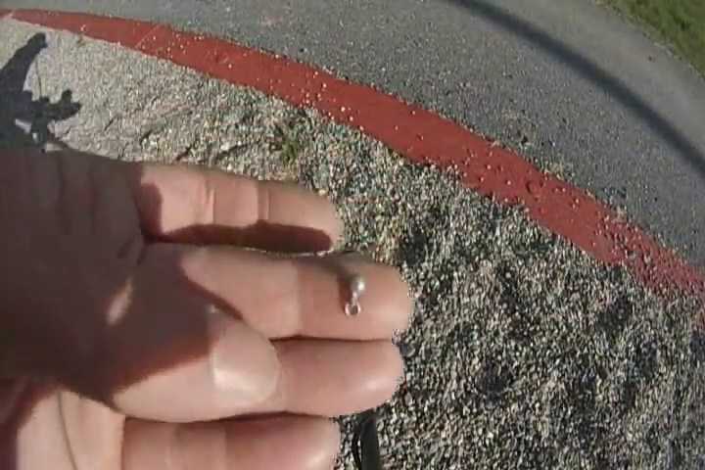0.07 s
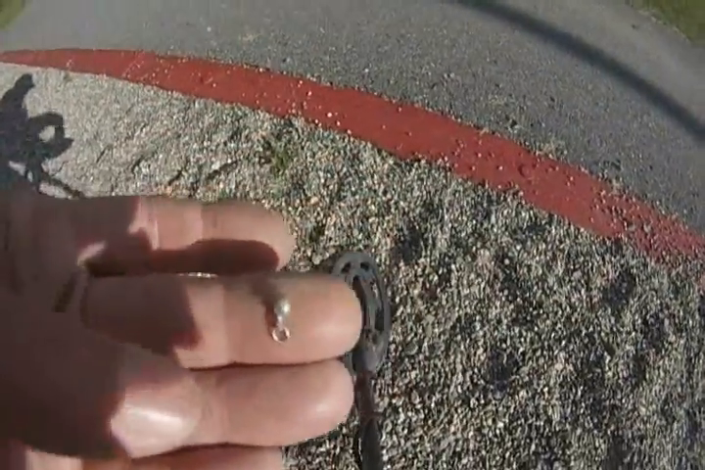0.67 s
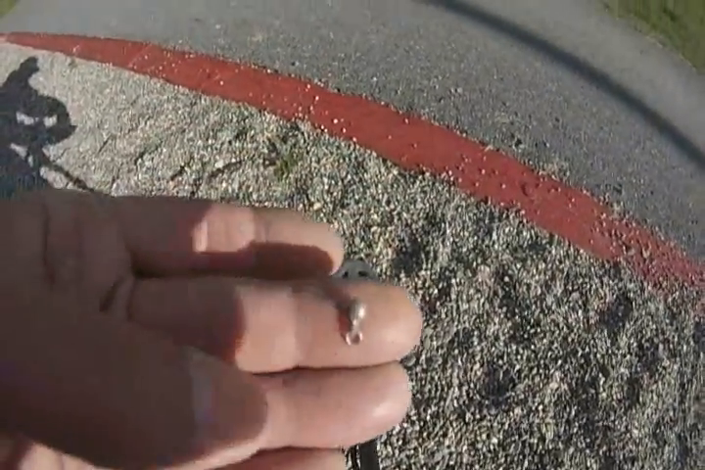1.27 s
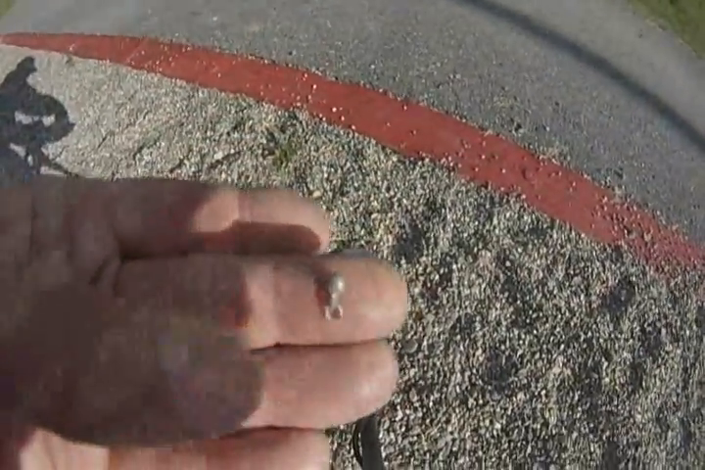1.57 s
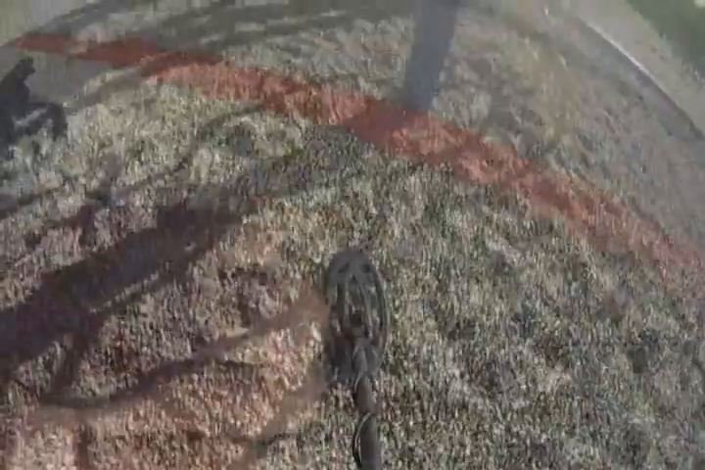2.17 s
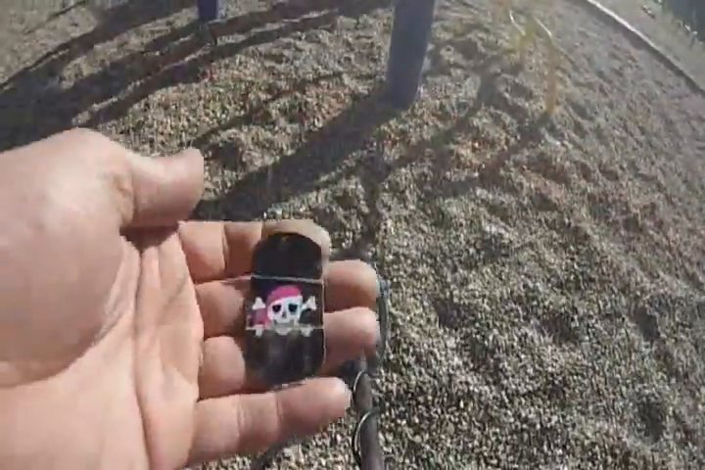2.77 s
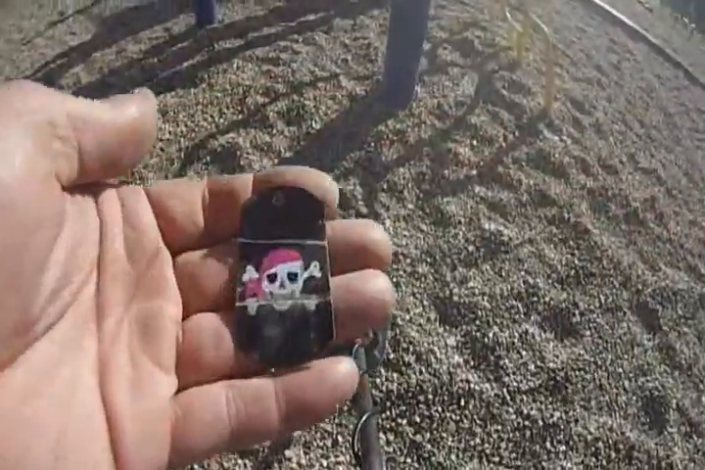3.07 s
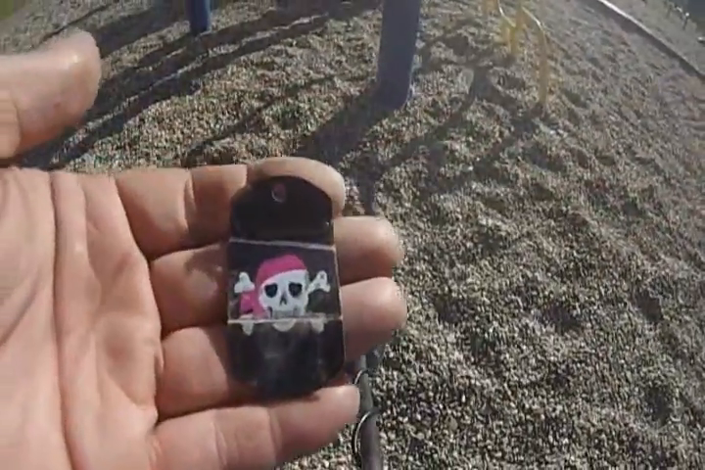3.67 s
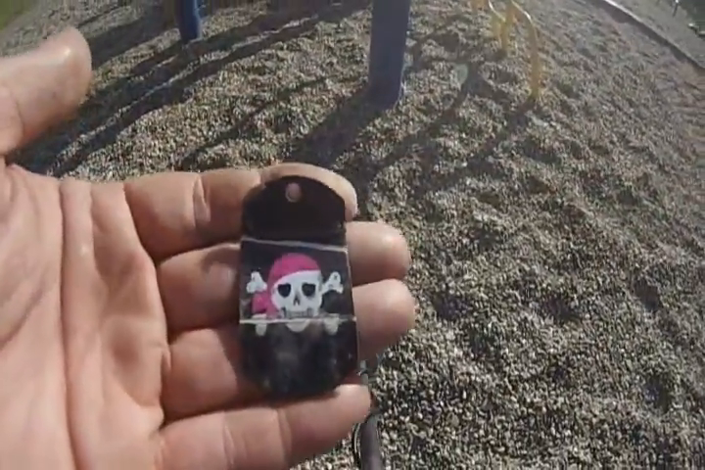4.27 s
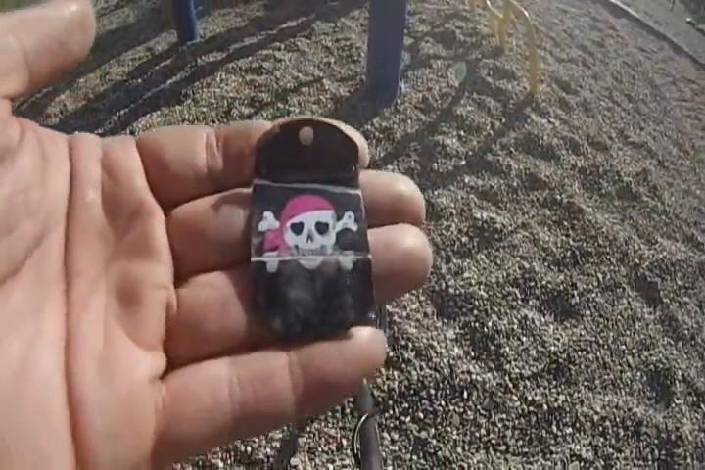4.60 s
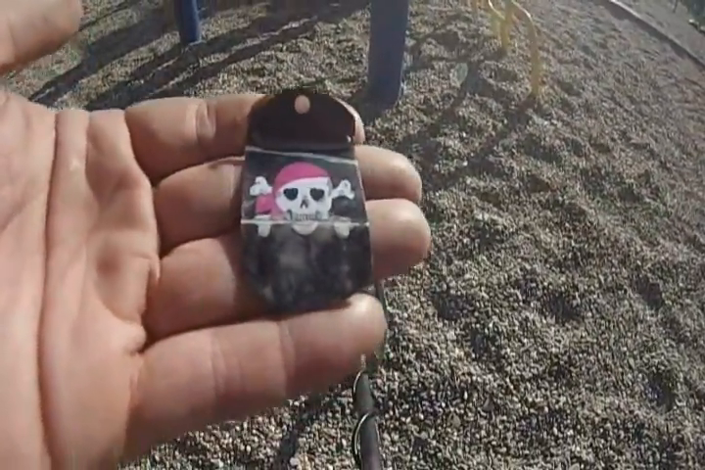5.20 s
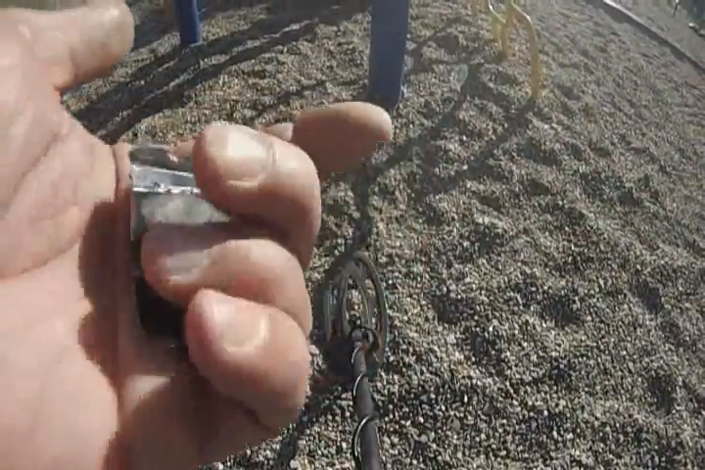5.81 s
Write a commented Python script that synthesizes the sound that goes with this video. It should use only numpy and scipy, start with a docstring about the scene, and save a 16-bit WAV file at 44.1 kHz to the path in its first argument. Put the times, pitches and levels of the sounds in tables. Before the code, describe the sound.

Fingers rub and knock on a plastic camera case amid short, gritty gravel scrapes, then ease into faint brushing outdoors.

```python
"""Gravel scrapes and rubbing fingers

A hand scrapes and shuffles over playground pea gravel in short spells, near a camera in a plastic case.
Gritty scrapes and fingers rubbing on the case make dull drags, bright slides and soft brushes.
Knocks ring the hollow case, soft pushes thump it, and the hand swishes past.
Handling adds a low rumble over faint outdoor air; one small chirp comes near the end."""
import sys
import numpy as np
from scipy import signal
from scipy.io import wavfile

SR = 44100
rng = np.random.default_rng(int(sys.argv[2]) if len(sys.argv) > 2 else 0)


def persist_wave(psi):
    """Save psi, clipped to +-1, as 16-bit WAV."""
    counts = np.round(np.clip(psi, -1, 1) * 32767).astype(np.int16)
    wavfile.write(sys.argv[1], SR, np.atleast_2d(counts).T)


N = 266805

# Hand strokes, one table for each kind. The body is the low part of the sound, the hiss the high part.
# (start t/s, attack t/s, hold t/s, release t/s, body level/dB, hiss level/dB, swell while held/dB)
DRAGS = [(0.0, 0.0017, 0.042, 0.023, -45, -59, 1.5), (.5, 0.0094, .01, 0.043, -53.5, -74, -0.5),
         (.562, 0.048, 0.21, .07, -28, -37.5, -20), (.84, 0.024, 0.073, 0.073, -48, -59.5, -1.5),
         (1.49, 0.033, 0.035, 0.11, -47, -44.5, 0), (1.59, 0.034, 0.31, 0.05, -52.5, -54.5, 11),
         (1.83, .02, 0.28, 0.027, -37.5, -44, 1.5), (2.07, 0.031, 0.0078, 0.012, -28.5, -33.5, 7),
         (2.19, .02, .13, 0.36, -42.5, -54, -2.5), (2.61, 0.022, 0.087, 0.14, -41, -56, 5),
         (2.772, 0.0058, 0.15, 0.057, -40.5, -53, -2.5), (2.93, 0.045, 0.62, .25, -48.5, -59, -4),
         (3.79, 0.018, 0.044, 0.088, -51.5, -70, -2.5), (4.01, 0.0071, .05, 0.54, -54.5, -69, -0.5),
         (4.24, 0.056, 0.14, .055, -45, -64, 9), (4.535, 0.009, 0.027, 0.3, -55, -68, -1.5),
         (4.63, 0.041, 0.12, 0.055, -43, -57.5, 8), (4.805, 0.016, 0.065, 0.059, -49, -62.5, 9.5),
         (5.74, 0.041, 0.08, 0.14, -57.5, -64, -4), (5.96, 0.017, .012, 0.039, -52, -47.5, 0)]
LIGHT_SLIDES = [(1.034, 0.0016, 0.017, 0.088, -40, -43, -3.5), (1.118, 0.019, 0.034, .04, -38, -46, 4.5),
                (4.988, .005, 0.041, 0.063, -48.5, -50, 8), (5.06, 0.048, 0.066, .06, -37.5, -50, 0.5),
                (5.19, 0.016, 0.16, .06, -37, -45.5, -0.5), (5.36, 0.021, 0.048, 0.011, -44, -43.5, -2),
                (5.925, .008, .01, 0.037, -52.5, -58, 2.5)]
SLIDES = [(1.165, 0.06, 0.1, 0.12, -31.5, -33.5, -1.5), (1.35, 0.051, 0.021, 0.028, -33.5, -47.5, 0.29),
          (5.054, 0.0035, 0.055, 0.042, -38, -40.5, 2.5)]
SWIPES = [(1.992, 0.0097, .012, 0.017, -32, -39.5, -0.63), (2.105, 0.012, 0.028, 0.082, -36, -40.5, 1.7),
          (2.14, 0.016, 0.0076, 0.014, -54, -34.5, 0)]
BRUSHES = [(2.434, 0.0019, 0.044, 0.053, -44, -47.5, 3), (2.49, 0.021, 0.041, 0.1, -41.5, -39, -0.5),
           (2.575, 0.016, 0.028, 0.031, -43, -35.5, -6.5), (5.42, 0.025, 0.094, .06, -56, -47, 6),
           (5.53, 0.024, 0.019, 0.082, -42, -40, -0.5), (5.59, .02, 0.05, 0.11, -54, -46, 1.5)]
# Tone colour of each kind of stroke: a curve (f/Hz, level/dB),
# then the resonances it wakes, which are peaks on that curve (f/Hz, width/Hz, height/dB).
DRAG_COLOUR = ([(20, -25), (100, -22.5), (250, -19.5), (420, -17), (700, -15.5), (1400, -33), (3000, -32.5),
               (5500, -39.5), (8000, -46), (16000, -55)], [(82.6, 40.5, 26.5), (545, 37, 9.5),
               (680.5, 280, 15), (1033, 360, 19.5), (1734, 560, 16), (2592, 110, 16.5), (4880, 580, 3)])
LIGHT_SLIDE_COLOUR = ([(100, -24.5), (250, -25), (420, -22.5), (700, -5), (1400, -17.5), (3000, -19),
                      (5500, -27.5), (8000, -31.5), (16000, -22)], [(772, 29, 12.7), (969, 174, 11.4),
                      (1864, 360, 15.3), (2432, 110, 11.7), (2975, 860, 19.2), (4030, 770, 24.8),
                      (5060, 1230, 23.8), (6840, 380, 16), (8200, 1940, 19), (11860.0, 980, 9.8)])
SLIDE_COLOUR = ([(100, -39), (250, -27), (420, -24), (700, -4.5), (1400, -14.5), (3000, -15.5),
                (5500, -21.5), (8000, -31.5), (16000, -45.5)], [(762, 130, 7.2), (1640, 160, 6.7),
                (2380, 130, 7.7), (2930, 150, 5.3), (3900, 260, 4.9), (4070, 360, 5), (5020, 520, 6.6),
                (11700, 260, 3.2)])
SWIPE_COLOUR = ([(100, -14), (400, -34), (700, -18.5), (1400, -23), (2600, -9.5), (5500, -11.5),
                (7500, -16.5), (9500, -25), (16000, -27)], [(706, 80, 8.5), (1140, 200, 8.5),
                (1600, 200, 2.8), (3680, 160, 8.3), (5330, 600, 5)])
BRUSH_COLOUR = ([(100, -34.5), (250, -12), (420, -15.5), (700, -6.5), (1400, -11.5), (3000, -21.5),
                (5500, -27), (8000, -34), (16000, -43)], [(625, 660, 20), (1086, 310, 11.2),
                (1785, 180, 14), (2680, 150, 6.7), (3270, 1140, 10.9), (5100, 260, 8.3)])
# Tone colour of the shaking case, the outdoor air and the crack of a knock (f/Hz, level/dB).
RUMBLE_COLOUR = [(15, -2), (40, -9.5), (60, 3.5), (85, -1), (125, -8), (200, -21), (320, -17.5),
                 (600, -49.5)]
AIR_COLOUR = [(20, -12.5), (90, -3.5), (200, -4), (400, -7), (750, -8), (1050, -9.5), (1350, -16),
              (2500, -17.5), (5000, -22), (9000, -27.5), (16000, -39.5)]
CRACK_COLOUR = [(300, -23), (900, 10), (1500, 1), (3500, -4.5), (5500, -14), (8000, -18.5), (16000, -42)]
# Knocks on the case (t/s, hollow level/dB, wall level/dB, hollow f/Hz, stretch factor of the fade).
KNOCKS = [(.576, -32, -48, 915, 1.7), (.6045, -15.5, -38, 725, 1.7), (.618, -19, -46, 660, 2.5),
          (.6427, -33, -25, 920, 2), (.65, -24, -25.5, 725, 1), (.908, -33.5, -64, 704, 2.2),
          (1.305, -22, -45, 747, 3), (1.344, -24.5, -31, 1170, .9), (1.4, -14.5, -20.5, 1130, 0.85),
          (1.409, -21, -25.5, 920, 0.66), (1.545, -40, -26, 725, 1.4), (1.6225, -30, -30, 870, 0.61),
          (1.708, -44, -38.5, 770, 1.7), (1.736, -32, -28.5, 760, 1.4), (1.846, -22.5, -32, 880, 1.1),
          (1.851, -23.5, -30.5, 820, 0.92), (1.874, -19.5, -28.5, 795, 1), (1.924, -27, -27, 1120, .8),
          (1.9695, -28.5, -25.5, 690, 0.73), (1.9817, -28, -23.5, 750, 0.95), (2.038, -28, -29, 620, 1.7),
          (2.059, -24, -24, 1000, 1.1), (2.104, -11, -29, 964, 0.69), (2.1895, -11, -17.5, 805, 1.44),
          (2.196, -18.5, -35, 910, 1.2), (2.471, -31.5, -38.5, 1250, 1.2), (2.779, -31.5, -46, 674, .8),
          (3.53, -34.5, -49, 583, 2.7), (3.829, -37.5, -56, 630, 1.1), (3.915, -34.5, -57, 600, 0.73),
          (4.2, -36.5, -55, 1170, 0.56), (4.389, -23.5, -45, 606, 3.3), (4.401, -31, -53, 606, 0.52),
          (4.45, -35, -47, 660, 0.89), (4.694, -36, -47, 660, 1.3), (4.785, -43, -40, 534, 1.9),
          (5.937, -39.5, -55, 784, 1.2)]
# Natural tones of the case walls, which each knock varies (f/Hz, level/dB, fade t/s).
# A fade is the time a sound takes to fall by 60 dB.
WALL_TONES = [(1757, 5, 0.019), (2510, -4, .012), (2897, -6, 0.027), (3250, 1.5, 0.01), (4124, 3, 0.019),
              (5130, 2.5, 0.021), (5700, -11, 0.016), (6400, -29, 0.008)]
# Soft pushes on the case (t/s, level/dB, f/Hz, fade t/s).
PUSHES = [(.915, -37, 73, 0.18), (1.392, -32, 100, 0.12), (1.619, -9, 26, 0.018), (1.63, -35, 16, .12),
          (1.848, -24, 86, 0.081), (1.877, -20, 97, 0.055), (1.983, -23, 46, 0.052),
          (2.105, -16.5, 90, 0.042), (2.195, -26.5, 83, 0.088), (4.79, -29.5, 74, 0.15)]
# A thin metallic ring (t/s, level/dB, f/Hz, width/Hz, fade t/s).
THIN_RING = (2.19, -59, 4200, 300, .6)
# Quick swishes of the hand, each a list of points along its way (t/s, level/dB, f/Hz).
SWISH_PATHS = [
    [(2.85, -44.5, 1010), (2.92, -46.5, 1140), (3.02, -45.5, 1260), (3.1, -50, 1300), (3.16, -62, 1390)],
    [(4.14, -55, 990), (4.175, -45.5, 1150), (4.196, -36.5, 1290), (4.21, -44, 1360), (4.235, -64, 1590)],
]


def amp(db):
    """Turns decibels into a factor to multiply by."""
    return 10 ** (np.asarray(db) / 20)


def evened(x):
    """Scales a sound to an average strength (rms) of 1."""
    return x / np.sqrt(np.mean(x ** 2) + 1e-20)


def burst(x, length_s=0.002):
    """Scales a hit to the energy of a short burst of strength 1."""
    return x / np.sqrt(np.sum(x ** 2) / (length_s * SR))


def add(mix, s, sound):
    """Mixes a sound in, starting at s seconds."""
    part = mix[max(round(s * SR), 0):][:len(sound)]
    part += sound[:len(part)]


def band(x, edge_hz, kind, order=4):
    """Keeps the "low" or the "high" side of a sound."""
    return signal.sosfilt(signal.butter(order, edge_hz, kind, fs=SR, output="sos"), x)


def coloured(x, curve, resonances=(), size=4096):
    """Gives a sound its tone colour: a curve with peaks standing on it."""
    f = abs(np.fft.fftfreq(size, 1 / SR))
    hz, db = np.transpose(curve)
    gain_db = np.interp(np.log(f + 1), np.log(hz), db)
    for centre, width, height in resonances:
        gain_db += height / (1 + (2 * (f - centre) / width) ** 2)
    # this makes each click ring after it lands, not before
    spectrum = np.exp(np.conj(signal.hilbert(np.log(amp(gain_db)))))
    return signal.fftconvolve(x, np.fft.ifft(spectrum).real)[:len(x)]


def resonate(x, hz, width_hz):
    """Keeps the sound near a steady or moving pitch: shift it to zero, smooth it, shift it back."""
    turn = np.exp(2j * np.pi * np.cumsum(hz * np.ones(len(x))) / SR)
    return (turn * band(x / turn, width_hz / 2, "low", order=2)).real


def fading_tone(t, hz, fade_s):
    """One pure tone that dies away."""
    return np.sin(2 * np.pi * hz * t) * amp(-60 * t / fade_s)


def pressure(rows, release_drop_db=21.5):
    """Strength of body and hiss over time: each stroke bites, swells or sags, then dies away."""
    power = np.zeros((2, N))
    for start, attack, hold, release, body_db, hiss_db, swell_db in rows:
        t = np.arange(N) / SR - start
        held = np.clip((t - attack) / hold, 0, 1)
        let_go = np.maximum(t - attack - hold, 0) / release
        shape = np.clip(t / attack, 0, 1) * amp(swell_db * held - release_drop_db * let_go)
        power += (amp([[body_db], [hiss_db]]) * shape) ** 2
    return np.sqrt(power)


def friction(slips_per_s, spread_db, hiss, judder_db, judder_hz):
    """Tiny slips of uneven size over a smooth hiss; the contact judders, so they come in clumps."""
    sizes = amp(spread_db * np.minimum(rng.exponential(1, N), 4)) * rng.choice([-1, 1], N)
    slips = evened(sizes * (rng.random(N) < slips_per_s / SR))
    rasp = slips + hiss * rng.standard_normal(N)
    judder = evened(band(rng.standard_normal(N), judder_hz, "low", order=2))
    return rasp * amp(judder_db * judder)


def strokes(rows, colour, rubbing, split_hz=1400):
    """Rubbing heard through the case: pressure feeds its hollow body, speed feeds the hiss above."""
    body_gain, hiss_gain = pressure(rows)
    sound = coloured(rubbing, *colour)
    body = evened(band(sound, split_hz, "low"))
    hiss = evened(band(sound, split_hz, "high"))
    return body_gain * body + hiss_gain * hiss


def scraping():
    """Scrapes and fingers rubbing the case: slow drags are gritty, faster strokes blur into a rasp."""
    drag = friction(slips_per_s=1200, spread_db=2.0, hiss=0.58, judder_db=2.5, judder_hz=75)
    slide = friction(slips_per_s=4000, spread_db=1.5, hiss=0.67, judder_db=-0.35, judder_hz=91)
    light = friction(slips_per_s=4000, spread_db=3.5, hiss=0.56, judder_db=1.0, judder_hz=70)
    brush = friction(slips_per_s=2500, spread_db=0.2, hiss=0.93, judder_db=1.4, judder_hz=59)
    swipe = friction(slips_per_s=5500, spread_db=1.0, hiss=1.0, judder_db=3.0, judder_hz=90)
    return (strokes(DRAGS, DRAG_COLOUR, drag)
            + strokes(LIGHT_SLIDES, LIGHT_SLIDE_COLOUR, light)
            + strokes(SLIDES, SLIDE_COLOUR, slide)
            + strokes(SWIPES, SWIPE_COLOUR, swipe)
            + strokes(BRUSHES, BRUSH_COLOUR, brush))


def rumble(rest_db=-62.5, drag_db=-46, slide_db=-52.5, firm_db=-35, growth=0.69):
    """The held case trembles a little at rest and shakes more the harder the hand drags or slides."""
    drag = pressure(DRAGS)[0]
    slide = pressure(SLIDES)[0] + pressure(LIGHT_SLIDES)[0]
    # a stroke whose body is at firm_db shakes the case at drag_db or slide_db
    dragged = amp(drag_db) * (drag / amp(firm_db)) ** growth
    slid = amp(slide_db) * (slide / amp(firm_db)) ** growth
    shake = np.sqrt(amp(rest_db) ** 2 + dragged ** 2 + slid ** 2)
    return shake * evened(coloured(rng.standard_normal(N), RUMBLE_COLOUR))


def air(level_db=-61):
    """The faint, steady hush of outdoor air."""
    return amp(level_db) * evened(coloured(rng.standard_normal(N), AIR_COLOUR))


def wall_clack(t, wall_db, stretch, soft_hz=1815, rise_hz=14400, reach_octaves=0.34):
    """A blow rings the wall tones near its own pitch; harder blows wake higher tones."""
    contact_hz = soft_hz + rise_hz * amp(wall_db)
    walls = np.zeros(len(t))
    for hz, db, fade_s in WALL_TONES:
        # where the blow lands decides the sign and exact pitch of each tone
        share = rng.choice([-1, 1]) / (1 + (np.log2(hz / contact_hz) / reach_octaves) ** 2)
        walls += share * amp(db) * fading_tone(t, hz * rng.uniform(0.91, 1.03), fade_s * stretch)
    return band(walls, 5700, "low", order=2)


def knocks(upper_ratio=1.3, upper_db=-9, base_fade_s=0.025, crack_db=-5, crack_s=0.0039, tick_s=0.0013):
    """Each knock rings the walls and two tones of the hollow inside, with a brief crack and tick."""
    t, out = np.arange(SR // 10) / SR, np.zeros(N)
    for s, hollow_db, wall_db, hollow_hz, stretch in KNOCKS:
        lower = fading_tone(t, hollow_hz, base_fade_s * stretch)
        upper = fading_tone(t, hollow_hz * upper_ratio, base_fade_s * stretch)
        hollow = band(lower + amp(upper_db) * upper, 600, "high", order=3)
        walls = wall_clack(t, wall_db, stretch)
        crack = coloured(rng.standard_normal(len(t)) * np.exp(-t / crack_s), CRACK_COLOUR)
        tick = band(rng.standard_normal(len(t)) * np.exp(-t / tick_s), 5300, "high", order=2)
        tick_gain = amp(-19) / stretch  # the shortest knocks are the hardest contacts and tick most
        clack = burst(walls) + amp(crack_db) * burst(crack) + tick_gain * burst(tick)
        add(out, s, amp(hollow_db) * burst(hollow) + amp(wall_db) * burst(clack))
    return out


def thumps():
    """Each soft push on the case sets off one low, fading tone."""
    t, out = np.arange(SR // 2) / SR, np.zeros(N)
    for s, db, hz, fade_s in PUSHES:
        add(out, s, amp(db) * fading_tone(t, hz, fade_s))
    return out


def ring():
    """A thin, wavering ring that outlasts the hardest knock."""
    s, db, hz, width_hz, fade_s = THIN_RING
    t, out = np.arange(SR // 2) / SR, np.zeros(N)
    wavering = evened(resonate(rng.standard_normal(len(t)), hz, width_hz))
    add(out, s, amp(db - 60 * t / fade_s) * wavering)
    return out


def swishes(width_hz=800, upper_ratio=1.83, upper_db=-15, upper_width_hz=900):
    """A smooth rasp whose two broad resonances rise in pitch as the hand speeds up."""
    out = np.zeros(N)
    for path in SWISH_PATHS:
        s, db, hz = np.transpose(path)
        t = np.arange(s[0], s[-1], 1 / SR)
        pitch = np.interp(t, s, hz)
        rasp = rng.standard_normal(len(t))
        lower = evened(resonate(rasp, pitch, width_hz))
        upper = evened(resonate(rasp, pitch * upper_ratio, upper_width_hz))
        swish = band(lower + amp(upper_db) * upper, 350, "high", order=2)
        add(out, s[0], amp(np.interp(t, s, db)) * swish)
    return out


def chirp(start_s=5.775, length_s=0.085, hz=4650, width_hz=320, db=-60):
    """One faint, fuzzy high chirp: a narrow band of noise fades in and out."""
    count, out = int(length_s * SR), np.zeros(N)
    fuzz = evened(resonate(rng.standard_normal(count), hz, width_hz))
    add(out, start_s, amp(db) * fuzz * np.hanning(count))
    return out


def scene():
    """Adds all the sounds into one channel."""
    return (scraping() + rumble() + air() + knocks() + thumps() + ring() + swishes() + chirp())[None]


def record(dry, edge_hz=16100):
    """Cuts away the very highest treble."""
    low_pass = signal.firwin(511, edge_hz, window=("kaiser", 9), fs=SR)
    return signal.oaconvolve(dry, low_pass[None], "same")


dry = scene()
out = record(dry)
persist_wave(out)
```